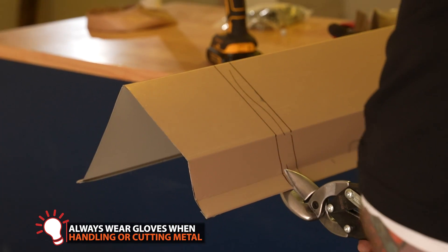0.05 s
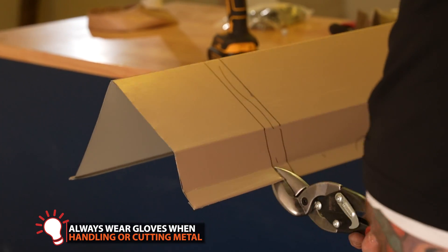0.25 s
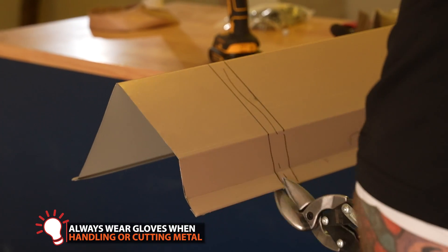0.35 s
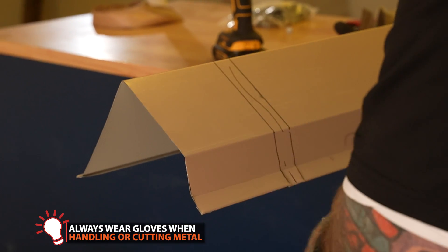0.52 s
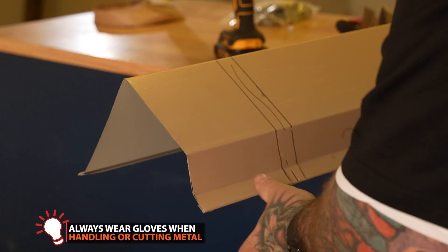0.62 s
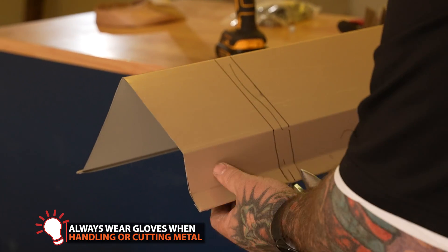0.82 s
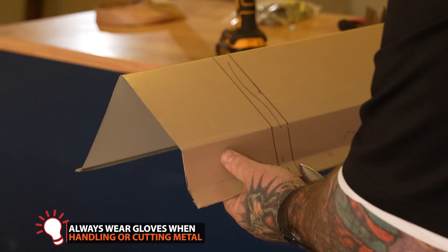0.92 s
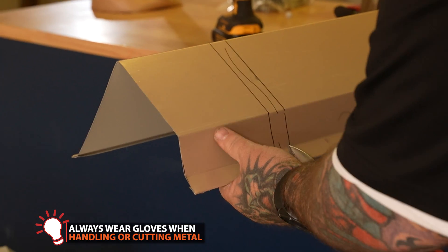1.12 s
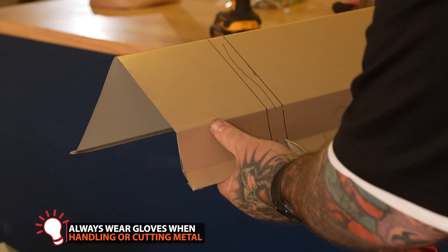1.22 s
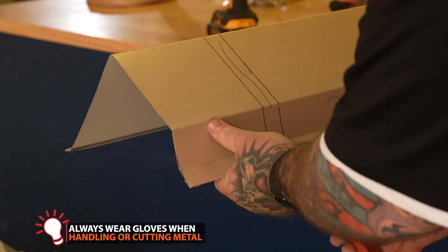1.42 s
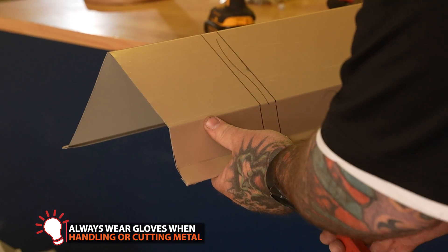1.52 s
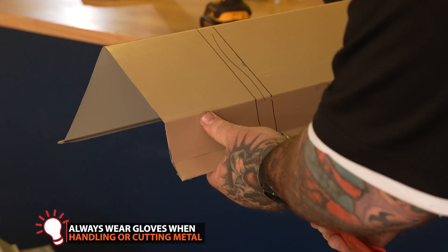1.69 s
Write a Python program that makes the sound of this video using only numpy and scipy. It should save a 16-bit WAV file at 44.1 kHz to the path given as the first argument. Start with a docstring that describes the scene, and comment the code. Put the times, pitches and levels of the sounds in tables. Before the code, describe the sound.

In a quiet workshop, snips bite through sheet metal with sharp cracks. The sheet crashes against a booming bench and its ring fades, then the snips tick again and the metal is knocked dully twice.

```python
"""Metal snips bite a notch into a long folded sheet-metal trim in a workshop.
The jaws tick on the edge, shear briefly in tiny slips and snap through with ringing cracks.
The sheet crashes, rattles on the booming bench and rings out, wavering as it flexes.
Then the snips tick on the sheet again and it is knocked dully twice as a hand takes hold."""
import sys
import numpy as np
from scipy import signal
from scipy.fft import rfft, irfft
from scipy.io import wavfile

SR = 44100
rng = np.random.default_rng(int(sys.argv[2]) if len(sys.argv) > 2 else 0)


def waveform_to_disk(signal):
    """Save audio, clipped to [-1, 1], as 16-bit WAV at the path in sys.argv[1]."""
    frames = np.transpose(np.atleast_2d(signal))
    scaled = np.clip(frames, -1, 1) * 32767
    samples = np.round(scaled).astype(np.int16)
    wavfile.write(sys.argv[1], SR, samples)


N = 77175
T = np.arange(N) / SR
BIN_HZ = np.arange(N // 2 + 1) * SR / N
TOP_HZ, JAW_SWELL_S = 15800, 0.0003

# tone colour of the sheet metal: f/Hz, relative level/dB
SHEET_COLOUR = [(45, -19.5), (100, -7), (170, -2.5), (270, 3.5), (350, 1.5), (430, 0), (600, 5.5),
                (800, -2.5), (1050, 3), (1230, -5), (1600, 2.5), (1950, -6), (2400, 0), (2850, -2.5),
                (3100, -4), (3750, 4), (4100, -1.5), (4400, -1), (5200, -2), (5700, -6.5), (6500, -5),
                (8200, -10), (10500, -9), (12700, -8.5), (15800, -12)]
# the jaws meeting the edge: t/s, level/dB, t60/s, treble/dB
JAW_TICKS = [(0.1726, -28, 0.025, -3), (0.8725, -46, 0.027, 23)]
# sharp jaw contacts, loud breaking through, light touching again: t/s, relative level/dB
JAW_SNAPS = [(0.2298, -40.5), (0.237, -37.5), (0.251, -31.5), (0.456, -51), (0.8705, -63.5), (0.928, -72)]


def from_db(db):
    """Decibels to gain."""
    return 10 ** (np.asarray(db) / 20)


def at_hz(points, hz):
    """Read a curve along a log-frequency axis."""
    freqs, values = np.transpose(points)
    return np.interp(np.log(np.maximum(hz, 1)), np.log(freqs), values)


def shelves(hz, bass_db, treble_db):
    """Gain of a bass shelf at 500 Hz and a treble shelf at 3100 Hz."""
    return from_db(bass_db / (1 + (hz / 500) ** 2) + treble_db * hz ** 2 / (hz ** 2 + 3100 ** 2))


def coloured(x, colour, treble_db=0):
    """EQ x with a colour curve and bring it to rms 1."""
    shaped = irfft(rfft(x) * from_db(at_hz(colour, BIN_HZ)) * shelves(BIN_HZ, 0, treble_db), N)
    return shaped / np.std(shaped)


def placed(x, start_s, swell_s):
    """Start x at a time, with a smooth attack."""
    start = int(start_s * SR)
    attack = 1 - np.exp(-(T / swell_s) ** 2)
    return np.concatenate([np.zeros(start), (x * attack)[:N - start]])


def ring(hz, gain, t60, phase=None, block=280):
    """Sum of dying sines, computed in blocks; phases are random unless given."""
    if phase is None:
        phase = rng.uniform(0, 2 * np.pi, len(hz))
    pole = (2j * np.pi * hz - np.log(1000) / t60) / SR
    steps = np.arange(block)
    block_starts = np.exp(np.outer(steps * block, pole) + 1j * phase) * gain
    return (block_starts @ np.exp(np.outer(pole, steps))).imag.ravel()[:N]


def drift(rate_hz):
    """Slow random modulation with spread 1."""
    slow = irfft(rfft(rng.standard_normal(N)) * BIN_HZ * np.exp(-(BIN_HZ / rate_hz) ** 2), N)
    return slow / np.std(slow)


def room_tone():
    """A quiet, steady bed of dark noise."""
    # background colour: f/Hz, relative level/dB
    colour = [(20, -13.5), (40, -0.5), (90, -1), (200, -5), (340, -6), (480, -5), (750, -17.5),
              (1500, -13.5), (2500, -30.5), (8000, -31.5), (16000, -40.5)]
    return from_db(-59) * coloured(rng.standard_normal(N), colour)


def workshop_reverb(x, t60_s=0.55, wet_db=-7.5):
    """The room answers with a diffuse, slightly dull tail."""
    tail = signal.sosfilt(signal.butter(1, 8000, fs=SR, output="sos"), rng.standard_normal(N))
    fade = placed(from_db(-60 * T / t60_s), start_s=0.012, swell_s=0.011)
    return from_db(wet_db) * signal.fftconvolve(x, tail * fade / np.linalg.norm(fade))[:N]


def bench_thuds():
    """The bench top booms briefly under the heavier pushes."""
    # thuds of the bench top: t/s, level/dB, f/Hz
    thuds = [(0.174, -43, 112), (0.235, -35.5, 63.6), (0.382, -37, 99), (1.098, -38, 172), (1.150, -56, 95),
             (1.235, -48, 112.4), (1.321, -41, 166.4), (1.423, -47, 127)]
    return sum(placed(ring(np.array([hz]), from_db(db), t60=0.23, phase=0), t, swell_s=0.006)
               for t, db, hz in thuds)


def trim_knocks():
    """The trim knocks against the bench in low, quickly damped modes."""
    # dull knocks: t/s, level/dB, pitch factor
    knocks = [(0.257, -21.5, 1.284), (0.357, -23, 1.04), (0.447, -24, 1.2), (0.473, -33, 1.04),
              (0.522, -32.5, 1.06), (0.600, -38, 0.92), (0.878, -38.5, 0.92), (1.100, -30.5, 0.99),
              (1.112, -35.5, 0.69), (1.161, -56, 0.8), (1.225, -51, 1.14), (1.319, -32.5, 0.92),
              (1.329, -29.5, 1.034), (1.414, -40, 0.83)]
    # modes of a knock: base f/Hz, relative level/dB, t60/s
    modes = [(105, -13, 0.062), (197, -3.5, 0.068), (277, -3.5, 0.066), (358, -6.5, 0.056),
             (433.6, -7, 0.12), (520.4, -4, 0.11), (607.6, -7.5, 0.088), (770, -15, 0.083)]
    hz, mode_db, t60 = np.transpose(modes)
    return sum(placed(ring(hz * pitch, from_db(db + mode_db), t60), t, swell_s=0.0018)
               for t, db, pitch in knocks)


def jaw_shear(slips_per_s=430):
    """Tiny slips crackle as the jaws shear the metal, from the first tick to the first snap."""
    slips = (rng.random(N) < slips_per_s / SR) * rng.standard_normal(N)
    cutting = (T > JAW_TICKS[0][0]) & (T < JAW_SNAPS[0][0])
    return from_db(-55.5) * coloured(slips, SHEET_COLOUR, treble_db=-11.5) * cutting


def jaw_ticks():
    """The jaws meet the edge with a short, dry burst of noise."""
    # colour of a tick: f/Hz, relative level/dB
    colour = [(100, -0.5), (600, -4), (1100, 0), (1500, 12.5), (2000, -4), (2600, 5), (3500, -16.5),
              (6500, -9.5), (9000, -31.5), (16000, -40.5)]
    out = np.zeros(N)
    for t, db, t60, treble_db in JAW_TICKS:
        noise = coloured(rng.standard_normal(N), colour, treble_db)
        out += placed(noise * from_db(db - 60 * T / t60), t, JAW_SWELL_S)
    return out


def jaw_snaps(crack_db=11, crack_t60_s=0.05, ring_share=0.7):
    """Each sharp contact cracks in the sheet's colour and sets the jaws ringing."""
    # modes of the jaws: f/Hz, relative level/dB, undamped t60/s
    modes = [(2767, 1, 0.23), (3828, -6.5, 0.67), (4387, 2.5, 0.45), (5103, -11.5, 0.88), (6340, -11.5, 1),
             (6450, -5.5, 0.24), (7130, -16, 0.35), (9920, -2.5, 0.17), (11350, -3, 0.087),
             (11760, 2.5, 0.6), (12810, -8.5, 0.27), (13240, -15, 0.68)]
    hz, mode_db, free_t60 = np.transpose(modes)
    gain = from_db(mode_db) / (1 + (hz / 6000) ** 2)
    crack_fade = from_db(crack_db - 60 * T / crack_t60_s)
    out = np.zeros(N)
    for t, db in JAW_SNAPS:
        crack = coloured(rng.standard_normal(N), SHEET_COLOUR, treble_db=0.5) * crack_fade
        ping = ring(hz, gain, free_t60 * ring_share)
        out += from_db(db) * placed(crack + ping, t, JAW_SWELL_S)
    return out


def sheet_flex(x, below_hz=1400, rate_hz=14, pitch_share=0.008, depth_db=1.5):
    """The bending sheet makes its low modes waver in pitch and level."""
    lows = signal.sosfiltfilt(signal.butter(2, below_hz, fs=SR, output="sos"), x)
    bent_time = T + np.cumsum(pitch_share * drift(rate_hz)) / SR
    return x - lows + np.interp(bent_time, T, lows) * from_db(depth_db * drift(rate_hz))


def sheet_crash(spacing_hz=13):
    """A wash of evenly crowded plate modes and a few strong tones; each contact excites them anew."""
    # blows on the sheet: t/s, level/dB, swell/s, bass/dB, treble/dB
    blows = [(0.171, -40.5, 0.0054, -3.5, -23.5), (0.231, -22, 0.0085, 1.5, 4.5),
             (0.338, -33.5, 0.0029, 9.5, -22), (0.436, -36.5, 0.0046, 3, -40),
             (0.454, -62.5, 0.0021, -6, 7.5), (0.499, -39.5, 0.0088, -3.5, -34),
             (0.871, -44, 0.00036, 8.5, -25.5), (0.928, -54, 0.0045, -9, -10)]
    # soft contacts of hand and snips that wake the low modes: t/s, level/dB
    nudges = [(0.872, -44), (1.100, -39.5), (1.322, -42.5)]
    # ring time of the wash: f/Hz, undamped t60/s
    decay = [(60, 2.5), (250, 1.26), (500, 1.31), (1000, 1.71), (2000, 1.186), (4000, 0.77), (5300, .74),
             (7000, 0.56), (11000, 0.37), (16000, 0.301)]
    # unevenness of its modes: f/Hz, level spread/dB
    scatter = [(1000, 0.5), (5000, 2.5)]
    # the strongest single modes: f/Hz, relative level/dB, undamped t60/s
    tones = [(275.4, -15.5, 0.71), (403.6, -7.5, 1.2), (423.2, -4, 0.96), (435.9, -8, 1.1),
             (494.5, -10.5, 1.2), (602.5, -14, 1.1), (902, -24.5, 1.2), (999.7, -14, 1.7),
             (1021.7, -11.5, 1.44), (1092, -13, 1.41), (3915, -16, .7), (4180, -17.5, 0.72),
             (4290, -20, .65), (4492, -11.5, 0.72)]

    slots = np.arange(3, TOP_HZ // spacing_hz)
    wash_hz = spacing_hz * (slots + rng.random(len(slots)))
    scatter_db = at_hz(scatter, wash_hz) * rng.standard_normal(len(slots))
    wash_gain = from_db(at_hz(SHEET_COLOUR, wash_hz) + scatter_db)
    wash_gain /= np.sqrt(np.sum(wash_gain ** 2) / 2)  # rms 1
    tone_hz, tone_db, tone_t60 = np.transpose(tones)
    hz = np.r_[wash_hz, tone_hz]
    gain = np.r_[wash_gain, from_db(tone_db - 1)]
    free_t60 = np.r_[at_hz(decay, wash_hz), tone_t60]

    out = np.zeros(N)
    for t, db, swell_s, bass_db, treble_db in blows:
        clang = ring(hz, gain * shelves(hz, bass_db, treble_db), free_t60 * 0.9)
        out += from_db(db) * placed(clang, t, swell_s)
    for t, db in nudges:
        muted = ring(hz, gain / (1 + (hz / 1900) ** 2), free_t60 * 0.7)
        out += from_db(db) * placed(muted, t, swell_s=0.0039)
    return out


def scene():
    """Sheet, snips, knocks and bench in the workshop's reverb, over its room tone."""
    sheet = sheet_flex(sheet_crash())
    snips = jaw_shear() + jaw_snaps() + jaw_ticks()
    direct = sheet + snips + trim_knocks() + bench_thuds()
    return (direct + workshop_reverb(direct) + room_tone())[None]


def record(dry):
    """A steep low-pass cuts the very top."""
    return signal.sosfilt(signal.ellip(12, 0.1, 80, TOP_HZ, fs=SR, output="sos"), dry)


dry = scene()
out = record(dry)
waveform_to_disk(out)
```